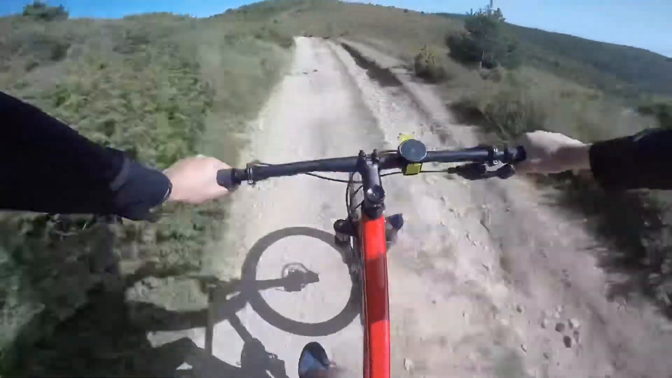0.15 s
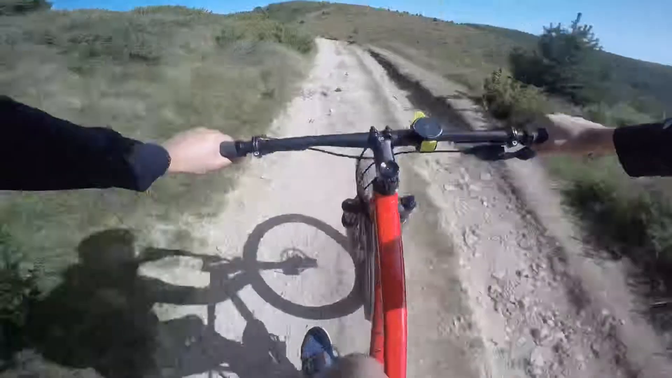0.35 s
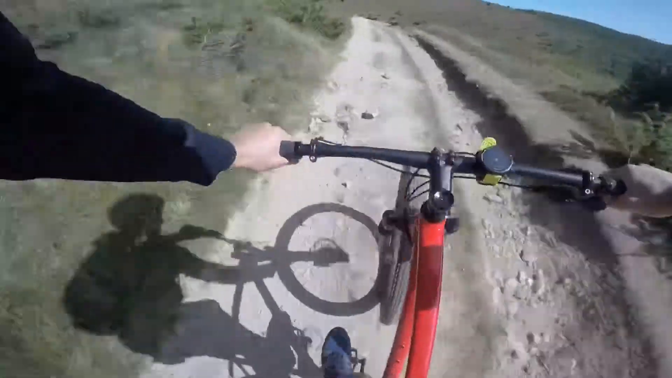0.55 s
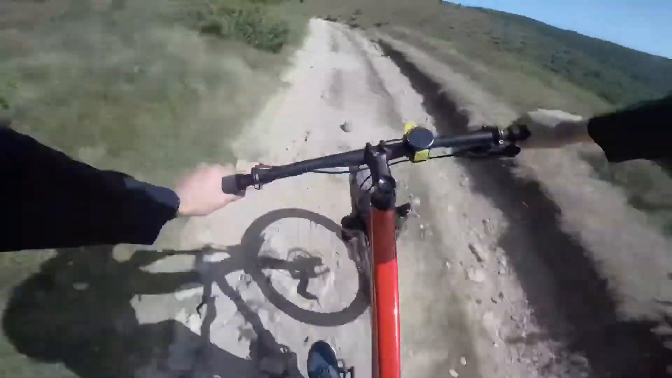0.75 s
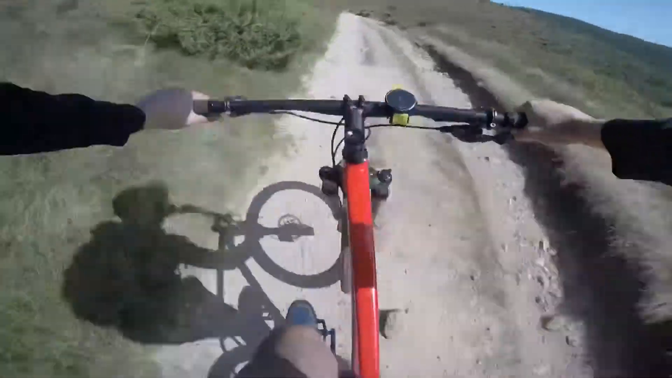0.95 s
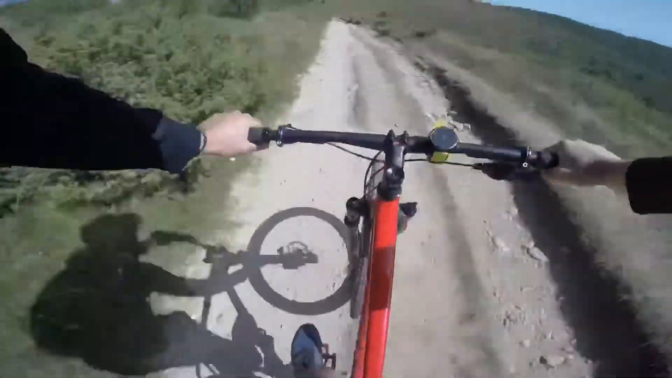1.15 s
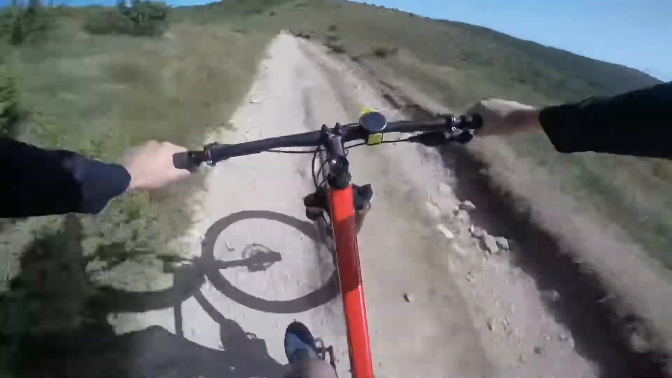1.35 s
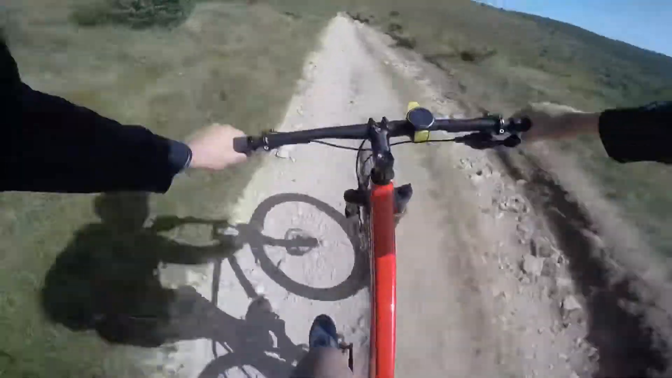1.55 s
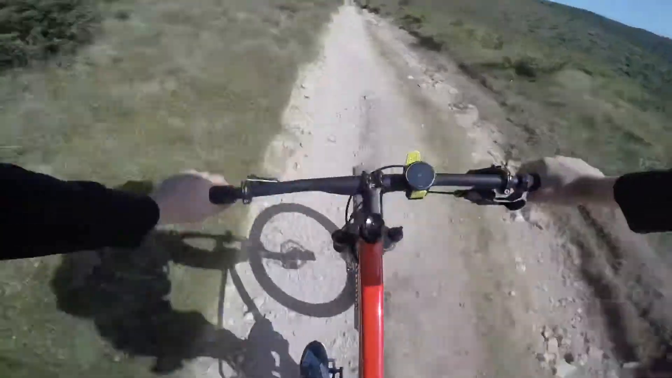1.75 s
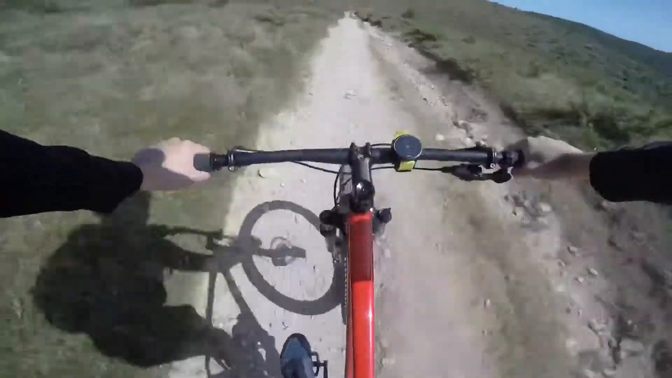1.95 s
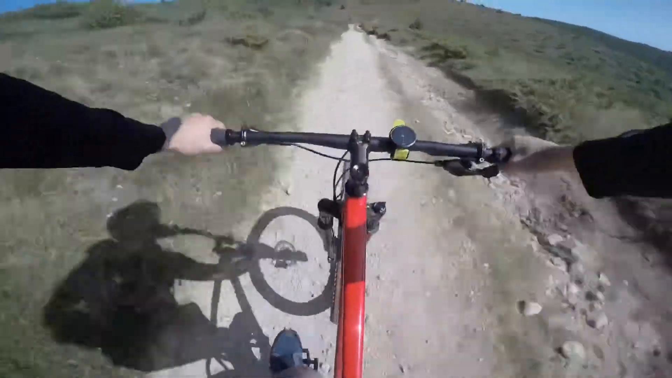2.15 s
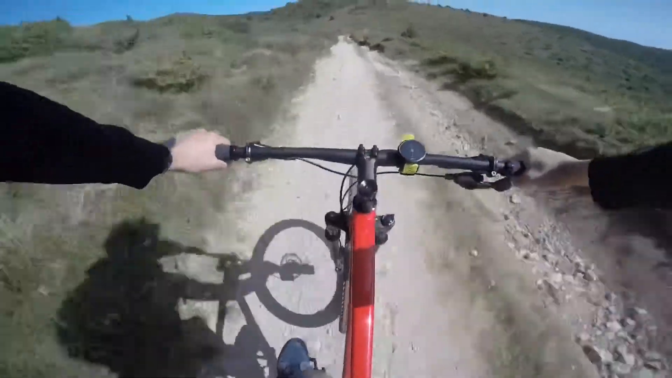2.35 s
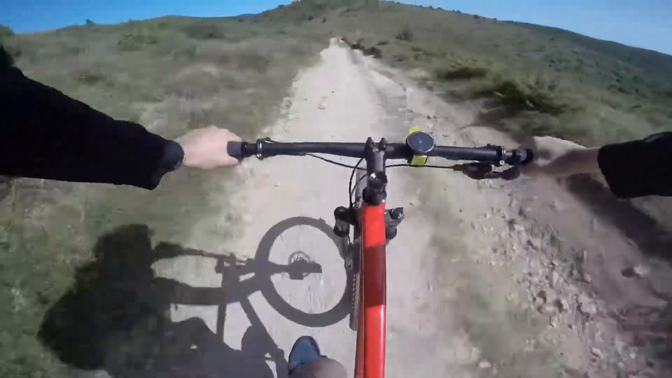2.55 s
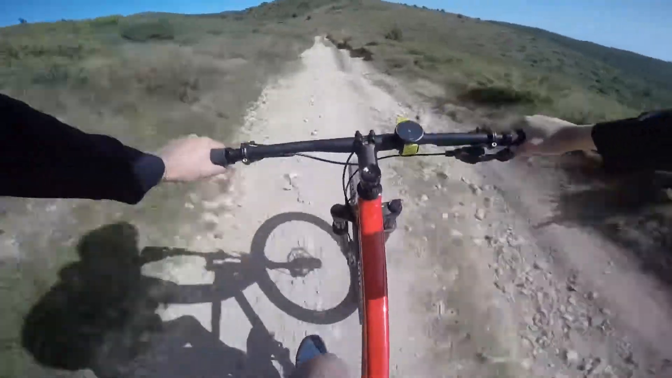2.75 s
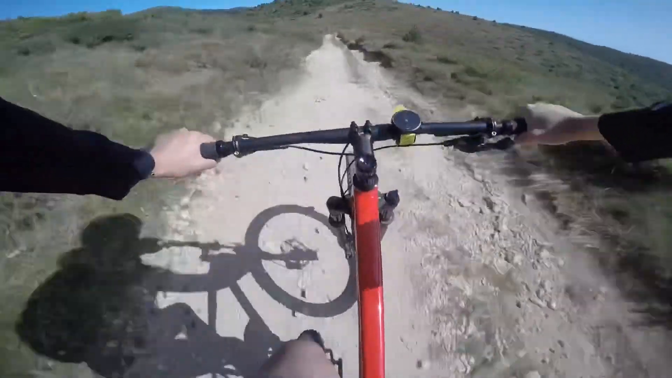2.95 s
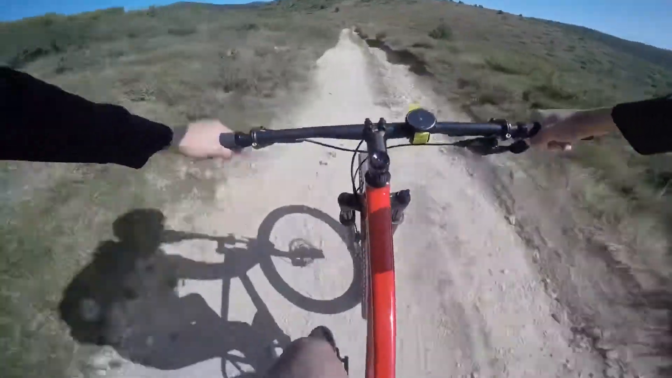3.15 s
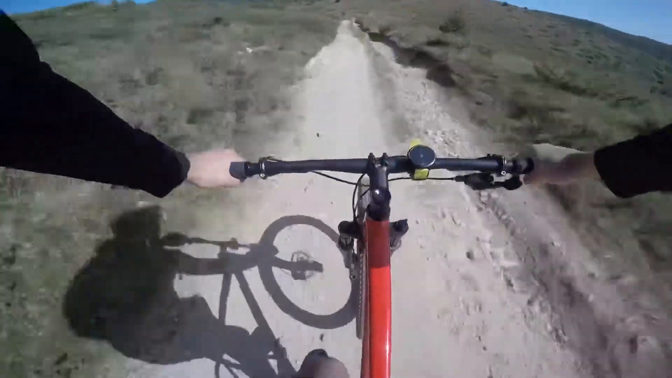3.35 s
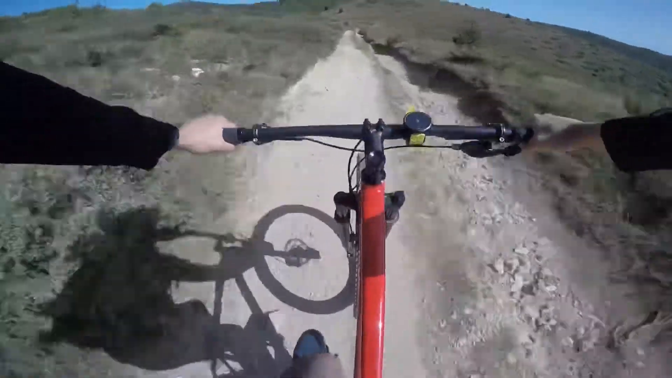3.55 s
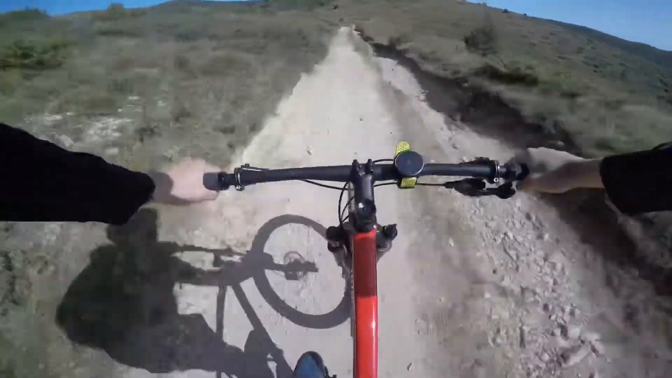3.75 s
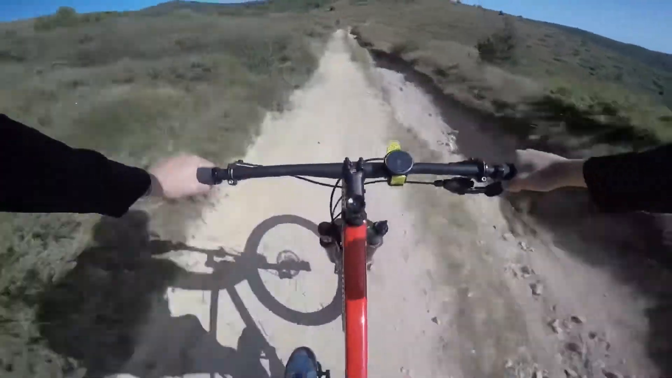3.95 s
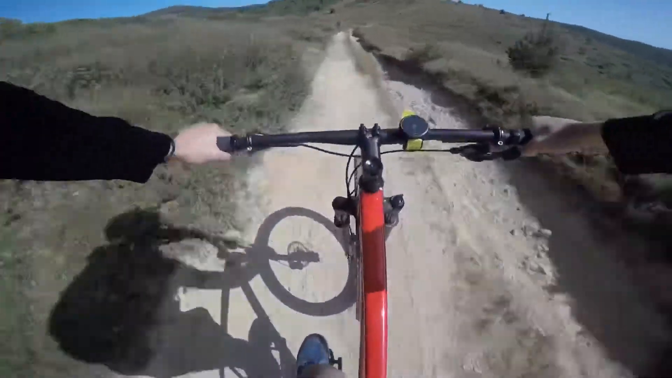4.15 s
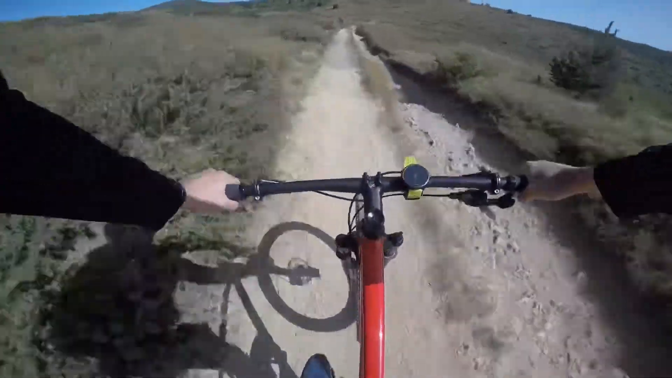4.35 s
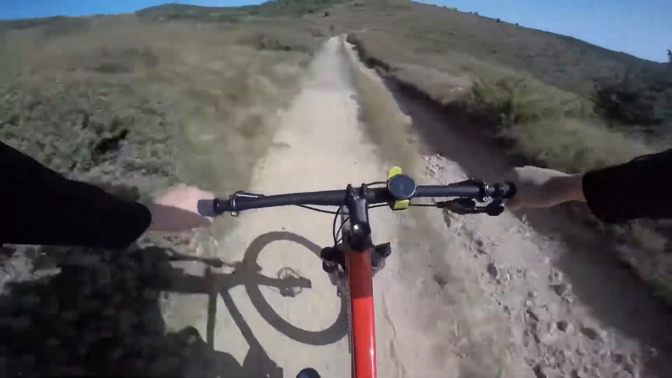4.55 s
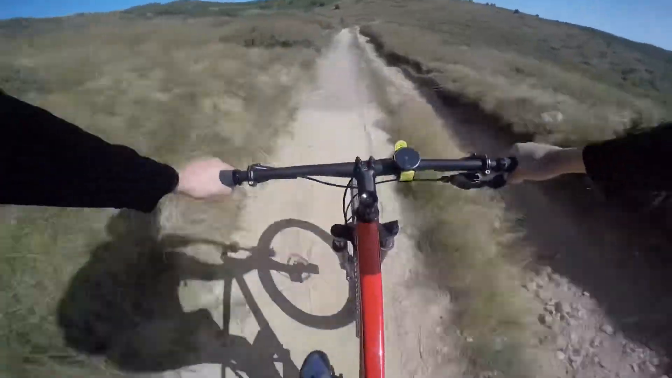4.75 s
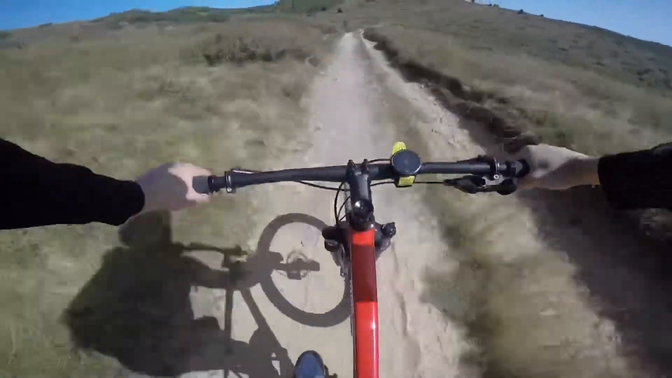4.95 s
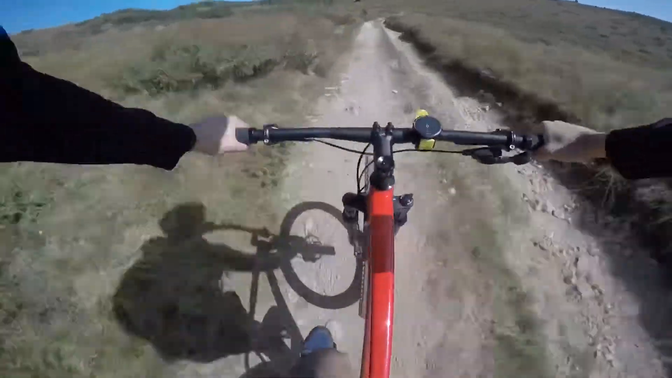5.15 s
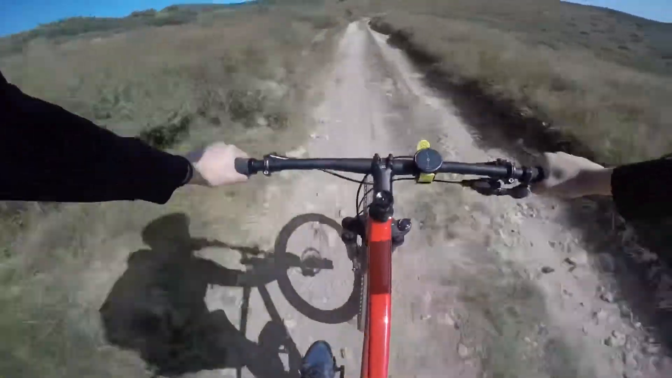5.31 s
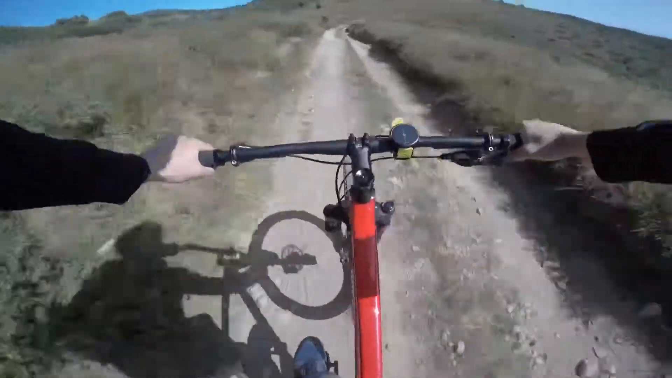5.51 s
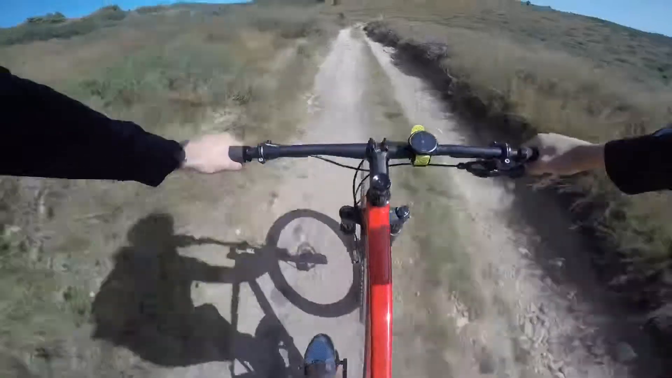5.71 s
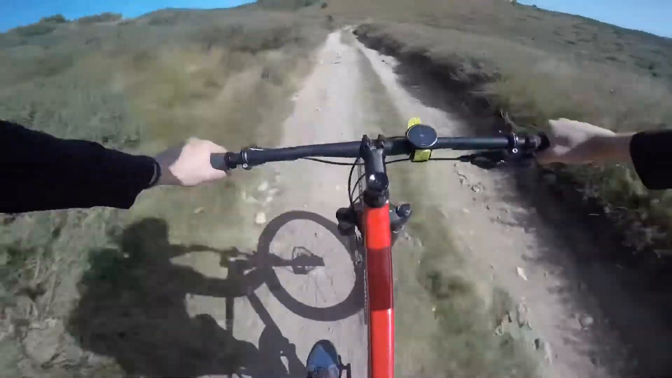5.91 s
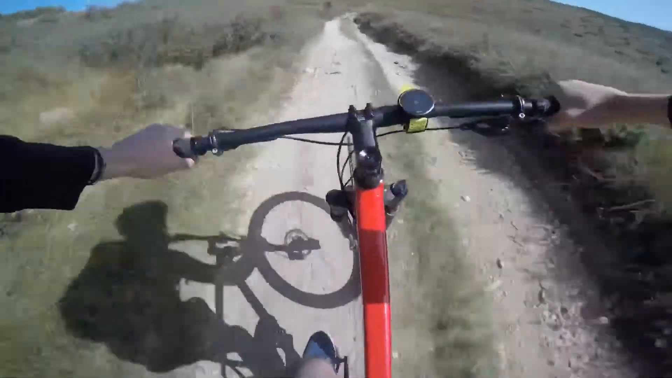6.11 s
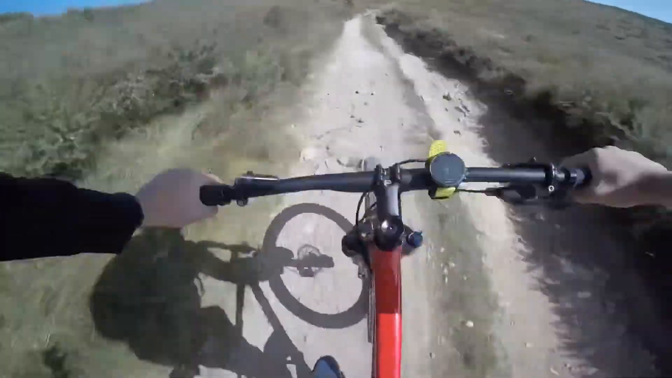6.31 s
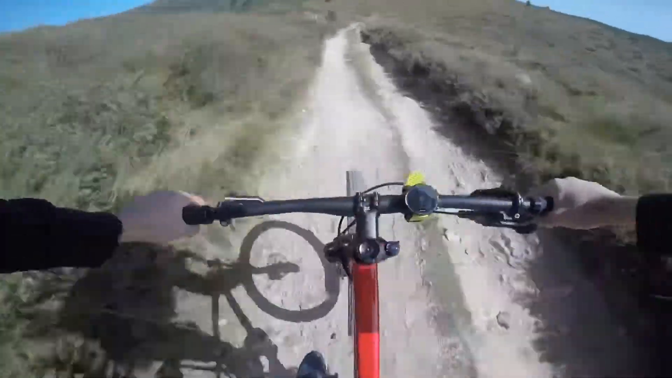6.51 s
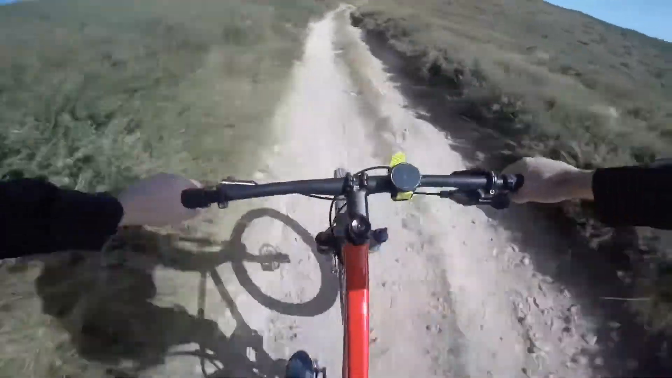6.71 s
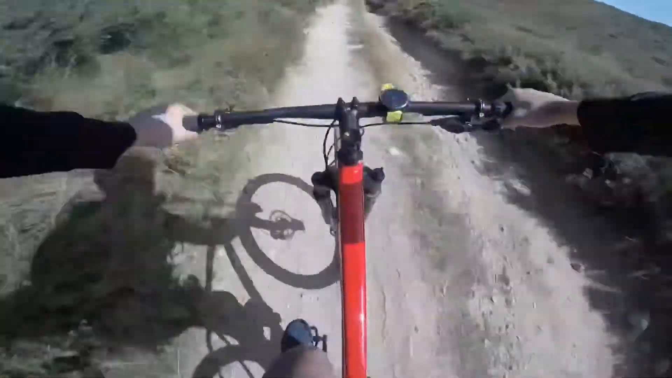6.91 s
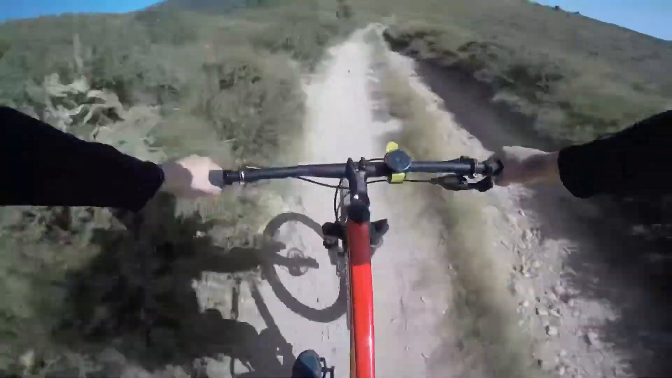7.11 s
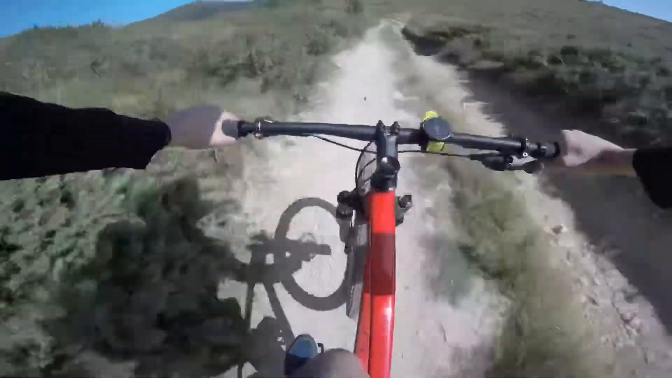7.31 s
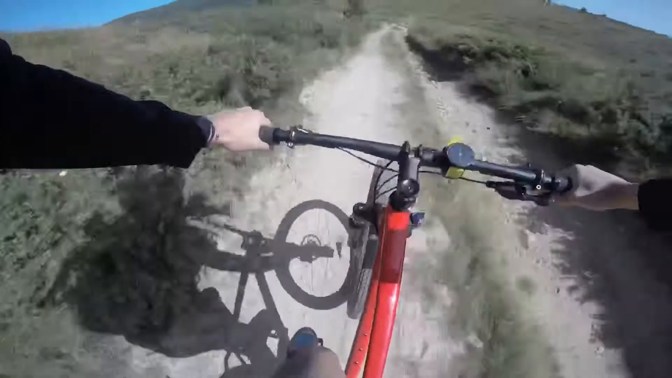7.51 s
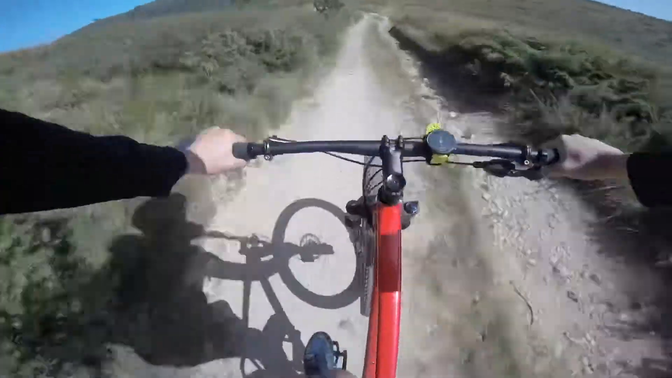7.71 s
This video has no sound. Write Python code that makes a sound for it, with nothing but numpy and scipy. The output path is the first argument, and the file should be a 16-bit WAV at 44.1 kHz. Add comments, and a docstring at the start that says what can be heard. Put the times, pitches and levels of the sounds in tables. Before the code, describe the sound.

Steady gritty crunching of bike tyres on a stony open track, close to a body-worn microphone. Hard early jolts bring a loud crack and brief metal ring, then scattered knocks, rattles and short gravel sprays. The middle runs a little smoother, before the crunch roughens and clacks bunch up in the last second or so. Soft ratchet buzzing, low wind buffeting, faint hiss and a thin high whine lie underneath.

```python
"""Gravel track, downhill: a mountain bike coasts, heard from a camera on the rider's chest.
Filtered random grains make the crunch and tyre rumble; decaying sines make thumps, jolts and a metal ping.
Filtered clicks and noise bursts make the clacks, rattles, flicks and stone sprays.
The freewheel buzzes softly as each click rings the hub's modes. Shaped noise makes wind and body shake,
above the camera's faint whine (sines) and hiss (noise)."""
import sys
import numpy as np
from scipy import signal
from scipy.fft import rfft, irfft, next_fast_len
from scipy.io import wavfile
from scipy.ndimage import uniform_filter1d, map_coordinates

SR = 44100
rng = np.random.default_rng(int(sys.argv[2]) if len(sys.argv) > 2 else 0)


def transcribe(signal):
    """Save signal, clipped to [-1, 1], as a 16-bit WAV file at the path in sys.argv[1]."""
    frames = np.atleast_2d(signal).T
    limited = np.clip(frames, -1, 1)
    pcm = np.round(limited * 32767).astype(np.int16)
    wavfile.write(sys.argv[1], SR, pcm)


N = 342657

# hollow knock, relative spectrum: f/Hz, level/dB
KNOCK_SPECTRUM = [(300, -30), (700, -16.5), (930, -4), (1150, 2.5), (1370, -7), (1650, -13), (2500, -24),
                  (6000, -63), (15000, -70)]
# sharp crack, relative spectrum: f/Hz, level/dB
CRACK_SPECTRUM = [(500, -19), (1100, -17.5), (1450, -2.5), (1850, -2.5), (2300, 3), (2750, -4),
                  (3200, -11.5), (5000, -19), (6300, -24.5), (8000, -36), (9000, -35), (15000, -67)]
BOUNCE_PER_S = 18  # random level knots per second as the wheels load and unload


def amp(db):
    """Decibels to gain."""
    return 10 ** (np.asarray(db) / 20)


def unit(x):
    """Scale to rms 1."""
    return x / np.sqrt(np.mean(x ** 2) + 1e-20)


def curves(rows):
    """One value per sample for each column after the time."""
    s, *cols = np.transpose(rows)
    return [np.interp(np.arange(N) / SR, s, c) for c in cols]


def wobble(rate):
    """A smooth random curve, rate knots a second."""
    return map_coordinates(rng.standard_normal(4096), [np.arange(N) * rate / SR + 2], mode="mirror")


def add(track, s, sound):
    """Mix a sound into a track at time s."""
    part = track[max(round(s * SR), 0):][:len(sound)]
    part += sound[:len(part)]


def sine(hz, t):
    """A sine of hz at the times t."""
    return np.sin(2 * np.pi * hz * t)


def filtered(x, response):
    """x times a complex response of frequency."""
    m = next_fast_len(N + SR // 2)
    return irfft(rfft(x, m) * response(np.fft.rfftfreq(m, 1 / SR)), m)[:N]


def coloured(x, spectrum, size=16384):
    """A minimum-phase filter through (Hz, dB) points, so that clicks keep their attack."""
    hz, db = np.transpose(spectrum)
    gain = amp(np.interp(np.log(np.fft.rfftfreq(size, 1 / SR) + 1), np.log(hz), db))
    cepstrum = irfft(np.log(gain))
    cepstrum[1:size // 2] *= 2  # fold to causal
    cepstrum[size // 2 + 1:] = 0
    return signal.fftconvolve(x, irfft(np.exp(rfft(cepstrum))))[:N]


def grains(rate, spread_db):
    """Contacts at random moments, rate a second, of random sign and exponentially spread dB size."""
    sizes = amp(spread_db * np.minimum(rng.standard_exponential(N), 4.5))
    return unit((rng.random(N) < rate / SR) * sizes * rng.choice([-1, 1], N))


def swells(rows):
    """A gain that swells and lets go once for each (middle s, length s, dB) row."""
    out = np.zeros(N)
    for s, length, db in rows:
        u = np.linspace(-2, 2, round(2 * length * SR))
        add(out, s - length, amp(db) * np.exp(-u ** 4))
    return out


def patchy(x, depth_db):
    """Each patch of ground favours its own stone sizes, so the colour keeps shifting."""
    z = signal.stft(x, nperseg=512)[2]
    field = uniform_filter1d(rng.standard_normal(z.shape), size=6, axis=0)
    field = uniform_filter1d(field, size=5, axis=1)
    return unit(signal.istft(z * amp(depth_db * unit(field)), nperseg=512)[1][:N])


def rolling_db(usual_db, grows):
    """Level of one rolling sound: grows dB per dB of coarseness; a hop takes the weight off the tyres."""
    # ground coarseness: t/s, crunch level/dB
    coarseness = [(0.0, -52.5), (0.43, -51.5), (0.67, -49.5), (0.78, -49), (1.88, -51.5), (2.55, -50.5),
                  (3.42, -49.5), (3.94, -52), (4.78, -51), (4.98, -46.5), (5.49, -48.5), (5.86, -50),
                  (6.21, -49.5), (6.43, -53.5), (6.66, -53.5), (6.9, -48.5), (7.36, -46.5), (7.77, -50)]
    # hops over a crest: middle t/s, length/s, drop of the crunch/dB
    hops = [(0.48, .09, 4.5), (2.586, 0.15, 5), (3.05, 0.17, 3.5), (4.106, 0.081, 2.5), (6.553, 0.13, 4)]
    usual_crunch_db = -50
    t = np.arange(N) / SR
    lift = sum(drop * np.exp(-(2 * (t - s) / length) ** 4) for s, length, drop in hops)
    return usual_db + grows * (curves(coarseness)[0] - lift - usual_crunch_db)


def electronics(hiss_db):
    """The camera's own thin whine and hiss: steady sines and shaped noise."""
    # whine: f/Hz, rms level/dB
    whine_lines = [(6293, -76), (6325, -77), (12618, -82)]
    # hiss, relative spectrum: f/Hz, level/dB
    hiss_spectrum = [(3000, 2.5), (6100, 1.5), (6300, 7), (6500, 3.5), (10800, -9.5), (11600, 1),
                     (12700, -2), (13400, -10), (15300, -10)]
    t = np.arange(N) / SR
    whine = sum(np.sqrt(2) * amp(db) * sine(hz, t) for hz, db in whine_lines)
    return whine + amp(hiss_db) * unit(coloured(rng.standard_normal(N), hiss_spectrum))


def wind(steadiness, level_db, flutter_db, surge_db):
    """Slow eddies and the rider's shaking push on the microphone."""
    # airstream: t/s, relative buffeting level/dB
    airstream = [(0.0, -36.5), (0.97, -26.5), (1.15, -32.5), (1.65, -29.5), (2.23, -38), (2.66, -38.5),
                 (2.95, -33), (3.3, -38), (3.55, -35), (4.15, -45.5), (4.39, -44), (4.65, -35), (4.82, -33),
                 (5.41, -33.5), (5.8, -37), (6.12, -31.5), (6.38, -27.5), (6.66, -33), (7.0, -31),
                 (7.77, -37.5)]
    # surges of shake and buffeting: middle t/s, length/s, relative level/dB
    surges = [(.44, 0.045, -15.5), (.6, 0.08, -18.5), (.89, 0.079, -16.5), (1.42, 0.17, -25.5),
              (2.44, 0.062, -22.5), (3.0, 0.15, -27), (5.92, 0.085, -18.5), (6.29, 0.05, -13.5),
              (6.375, 0.072, -14), (6.82, 0.1, -21), (7.17, 0.27, -29), (7.35, 0.097, -25.5),
              (7.73, 0.072, -21.5)]
    # airstream, relative spectrum: f/Hz, level/dB
    stream_spectrum = [(8, -9), (18, 3), (27, -0.5), (40, -11.5), (60, -17), (100, -30), (300, -78.5),
                       (900, -110)]
    # slow heave of a surge, relative spectrum: f/Hz, level/dB
    heave_spectrum = [(8, -17), (18, -1.5), (27, 2.5), (40, -13.5), (60, -39.5), (100, -40), (300, -87),
                      (900, -115)]

    def eddies(spectrum):
        """Low noise with its own level swings evened out."""
        noise = unit(coloured(rng.standard_normal(N), spectrum))
        swell = np.sqrt(np.abs(uniform_filter1d(noise ** 2, SR // 12)) + 1e-3)
        return unit(noise / swell ** steadiness)

    stream = amp(curves(airstream)[0] + level_db + flutter_db * wobble(5.4))
    return stream * eddies(stream_spectrum) + amp(surge_db) * swells(surges) * eddies(heave_spectrum)


def freewheel(level_db, size_db, scatter_s, waver_db, drift_db):
    """Pawls drop over the ratchet's teeth; each click rings the hub, whose modes come and go."""
    # ratchet speed: t/s, rate/clicks per s
    click_rate = [(0, 85), (.6, 103), (1.45, 69), (2.0, 78), (2.6, 77), (3.2, 81), (3.8, 91), (4.3, 91),
                  (4.7, 100), (5.5, 84), (6.1, 91), (6.6, 84), (7.0, 100), (7.77, 90)]
    # hub modes: f/Hz, relative level/dB, t60/s
    hub_modes = [(3450, 4.5, 0.025), (4880, 1, 0.012), (6960, -3.5, 0.017), (7860, -3, 0.028),
                 (9700, -4.5, .014), (11600, -6, 0.0057), (12600, -5.5, 0.0087)]
    teeth = np.cumsum(curves(click_rate)[0]) / SR
    times = np.flatnonzero(np.diff(np.floor(teeth))) / SR
    t = np.arange(SR // 25) / SR
    rings = np.array([amp(db - 60 * t / t60) * sine(hz, t) for hz, db, t60 in hub_modes])
    chance = rng.standard_normal((1024, len(hub_modes) + 1))
    drifts = unit(uniform_filter1d(rng.standard_normal((1024, len(hub_modes))), size=7, axis=0))
    out = np.zeros(N)
    for s, (late, *sizes), drift in zip(times, chance, drifts):
        mode_gains = amp(size_db * np.array(sizes) + drift_db * drift)
        add(out, s + scatter_s * late, mode_gains @ rings)
    return amp(level_db + waver_db * wobble(4.6)) * unit(out)


def tyres(level_db, spread_db, bounce_db):
    """Knobs and small stones drum on the air-filled tyres: random grains through a low spectrum."""
    # track bumpiness: t/s, relative rumble level/dB
    bumpiness = [(0.0, -47.5), (1.36, -43.5), (2.6, -49), (3.48, -45), (4.02, -47.5), (4.7, -46),
                 (5.02, -41.5), (6.34, -43), (6.6, -48), (6.95, -40), (7.12, -45), (7.77, -40.5)]
    # tyre drumming, relative spectrum: f/Hz, level/dB
    tyre_spectrum = [(35, -15), (65, 1.5), (90, 2), (125, -1), (165, -6), (220, -13), (340, -15),
                     (480, -23), (900, -22.5), (3000, -121)]
    level = curves(bumpiness)[0] + level_db + bounce_db * wobble(BOUNCE_PER_S)
    return amp(level) * unit(coloured(grains(900, spread_db), tyre_spectrum))


def thumps(level_db, t60, thud_t60):
    """A larger stone makes the tyre boom for a moment, with a short dull thud of higher partials."""
    # tyre on a large stone: t/s, relative boom level/dB, relative thud level/dB
    stone_hits = [(0.254, -34, -47), (0.369, -36, -37), (.634, -38, -37.5), (.699, -25.5, -41),
                  (1.239, -21, -33.5), (1.574, -28.5, -42), (2.114, -32, -37), (2.441, -51, -35),
                  (2.713, -41, -53), (2.838, -41, -40), (3.121, -36, -39), (3.543, -29, -48),
                  (5.171, -27.5, -43), (5.507, -27.5, -43), (6.097, -29, -43), (6.181, -27, -34),
                  (6.683, -47, -42), (6.797, -29.5, -49), (7.301, -32.5, -32.5), (7.39, -19, -40),
                  (7.566, -28, -45)]
    mean_boom_hz = 148.2
    t = np.arange(SR // 5) / SR
    onset = 1 - np.exp(-t / 0.001)
    out = np.zeros(N)
    for s, db, thud_db in stone_hits:
        hz = mean_boom_hz * rng.normal(1, 0.094)
        boom = amp(db - 60 * t / t60) * sine(hz, t)
        partials = sum(sine(hz * k * rng.normal(1, 0.032), t) / k for k in (1.6, 2.3, 3.7))
        thud = amp(thud_db - 60 * t / thud_t60) * partials
        add(out, s, amp(level_db) * (boom + 2 * thud) * onset)
    return out


def jolts(level_db, t60, rise_s):
    """The wheels drop into a hole: a decaying low sine of tyres and frame, its start cushioned by the fork."""
    # jolts: t/s, relative level/dB, f/Hz
    holes = [(.252, -24, 78), (.42, -16, 51), (0.565, -14.5, 48), (0.855, -16, 46), (1.358, -13.5, 50),
             (2.446, -25, 99), (2.71, -25.5, 102), (3.836, -27.5, 108), (4.136, -23, 55), (5.895, -20, 36),
             (6.26, -16.5, 99), (6.272, -15, 38), (7.399, -14.5, 64), (7.716, -18, 80)]
    t = np.arange(SR // 5) / SR
    cushion = 1 - np.exp(-np.square(t / rise_s))
    out = np.zeros(N)
    for s, db, hz in holes:
        add(out, s, amp(db + level_db - 60 * t / t60) * cushion * sine(hz, t))
    return out


def rattles(per_s, spread_db, knock_db, crack_db, grows):
    """Loose parts tick lightly at random, louder on coarse ground."""
    ticks = grains(per_s, spread_db)
    knock = unit(coloured(ticks, KNOCK_SPECTRUM))
    crack = unit(coloured(ticks * amp(3.8 * wobble(40)), CRACK_SPECTRUM))
    return amp(rolling_db(knock_db, grows)) * knock + amp(rolling_db(crack_db, grows)) * crack


def pings(crack_db):
    """A flung stone cracks against metal, bounces, and rings its modes."""
    # stone on metal: t/s, level/dB
    strikes = [(0.7251, -38.5), (0.7285, -35)]
    # metal modes: f/Hz, relative level/dB, t60/s
    metal_modes = [(2700, -5, .012), (3467, 3.5, 0.04), (4420, 3, 0.012), (4920, -1.5, 0.011),
                   (6400, -7, 0.01), (7330, -9, .018), (7600, -13, .02)]
    t = np.arange(SR // 8) / SR
    out = np.zeros(N)
    for s, level in strikes:
        ring = sum(amp(db + rng.normal(0, 1.3) - 60 * t / t60) * sine(hz, t) for hz, db, t60 in metal_modes)
        crack = amp(crack_db - 60 * t / 0.011) * rng.standard_normal(len(t))
        add(out, s, amp(level) * (ring + crack))
    return out


def flicks(level_db, t60):
    """Grit flicks the frame, too light to knock: a short bright tick of decaying noise."""
    # grit on the frame: t/s, relative level/dB
    grit_hits = [(0.86, -34.5), (1.7495, -46), (1.809, -45), (1.959, -47), (3.441, -39), (5.3498, -41),
                 (5.804, -40), (6.800, -41), (6.8284, -37), (6.8575, -36)]
    # tick, relative spectrum: f/Hz, level/dB
    tick_spectrum = [(800, -35), (2500, -18), (4400, 7), (6000, -8), (7800, 2), (8800, -12), (11800, -10.5),
                     (15000, -28)]
    t = np.arange(SR // 30) / SR
    out = np.zeros(N)
    for s, db in grit_hits:
        tick = coloured(amp(-60 * t / t60) * rng.standard_normal(len(t)), tick_spectrum, size=1024)
        add(out, s, amp(db + level_db) * tick / np.linalg.norm(tick))
    return out


def clacks(clunk_db, knock_db, crack_db, chatter_db, chatter_t60, scrape_s):
    """Stones and loose parts scrape in, clunk, knock and crack (crack pitch per hit), then chatter briefly."""
    # clacks: t/s, relative clunk, knock and crack levels/dB, crack pitch f/Hz
    hits = [(0.067, -53, -41, -42, 2570.0), (0.098, -44, -45, -40, 2510.0), (0.170, -52, -39, -34.5, 2250),
            (0.2534, -32, -41, -54, 2060.0), (0.3295, -58.0, -39.5, -39, 2350.0),
            (0.338, -54, -35, -38, 2200), (0.462, -57, -42, -42, 2050.0), (0.491, -58, -58.5, -36, 2290.0),
            (0.7478, -33, -18, -22, 2230), (0.821, -31, -46, -48, 2270), (1.0413, -39, -51, -46, 2610.0),
            (1.333, -50, -38, -29, 2200), (1.428, -56, -29, -27.5, 1950), (1.588, -52, -43, -32, 2300),
            (1.679, -60.0, -44, -37, 2320.0), (1.749, -49, -44, -29.5, 2620.0),
            (1.786, -59.0, -40, -32, 1950), (1.882, -52, -44, -30, 2320), (1.967, -52, -37, -39, 2350),
            (2.08, -32, -42, -54, 2000), (2.105, -50, -42, -53, 2000), (2.13, -35, -40, -52, 2000),
            (2.310, -52, -40, -45, 2210), (2.568, -34, -50, -56, 2210), (2.4317, -55, -35, -37, 2400),
            (2.4432, -34, -31, -32, 1990), (2.8376, -31.5, -40, -41, 2270),
            (2.966, -35.5, -39, -40, 2490.0), (3.082, -55, -60, -42, 2750),
            (3.119, -43, -37.5, -53, 2120.0), (3.1889, -35, -36, -31.5, 2290),
            (3.245, -37, -34, -38, 1700.0), (3.331, -52, -35, -35.5, 2410),
            (3.4385, -36, -29.5, -27.5, 2450), (3.5466, -28, -35, -43, 2430), (3.559, -55, -50, -40, 2420),
            (3.5744, -50, -37, -33.5, 1940.0), (3.8912, -41, -33, -25, 2400),
            (4.067, -57, -54, -40, 1810.0), (4.3689, -40, -47, -33.5, 2200.0), (4.696, -50, -38, -40, 2580),
            (4.8043, -33, -48, -37, 2400), (4.907, -50, -27.5, -30.5, 2540),
            (5.367, -59.0, -38, -35.5, 1870.0), (5.872, -31, -33, -35, 2240.0),
            (5.9846, -39, -40, -39, 2190.0), (6.0587, -46.0, -48, -47, 2180.0),
            (6.345, -50, -52, -41, 2300), (6.361, -30, -49, -46, 2210), (6.548, -39, -52, -58, 2190),
            (6.6854, -38, -35, -39, 2700.0), (6.7777, -54, -42, -32.5, 2520.0),
            (6.8268, -51, -33, -29, 2170.0), (6.8646, -32, -23, -21.5, 2000),
            (6.884, -35, -34, -26.5, 1920.0), (6.9716, -50, -33, -32.5, 2080),
            (6.9931, -53, -29, -25, 2030.0), (7.3042, -40, -28, -30.5, 2330.0),
            (7.3972, -35, -29, -29, 2240.0), (7.4071, -47.5, -22, -16.5, 2060),
            (7.4211, -30, -28, -25, 2300), (7.4475, -52.0, -25.5, -24, 2230), (7.563, -50, -45, -33, 2310),
            (7.574, -48, -38.5, -35.5, 2200)]
    # low clunk, relative spectrum: f/Hz, level/dB
    clunk_spectrum = [(120, -21.5), (250, -4.5), (350, 3), (450, -8.5), (620, -18), (900, -38), (3000, -57),
                      (15000, -80)]
    usual_crack_hz = 2310  # pitch of the unshifted crack spectrum
    lead = SR // 100
    t = np.arange(-lead, SR // 20) / SR
    contact = amp(chatter_db - 60 * np.maximum(t / chatter_t60, -t / scrape_s))
    out = np.zeros(N)
    for s, clunk, knock, crack, hz in hits:
        voices = [(clunk_spectrum, clunk + clunk_db, 1),
                  (KNOCK_SPECTRUM, knock + knock_db, 1),
                  (CRACK_SPECTRUM, crack + crack_db, hz / usual_crack_hz)]
        for spectrum, db, pitch in voices:
            blow = (t == 0) + contact * rng.standard_normal(len(t))
            sound = coloured(blow, np.multiply(spectrum, [pitch, 1]), size=1024)
            add(out, s + t[0], amp(db) * sound / np.linalg.norm(sound))
    return out


def scuffs(level_db, per_s, spread_db):
    """A tyre biting into loose gravel throws a short spray of small stones: gated random grains."""
    # bites: middle t/s, length/s, relative level/dB
    bites = [(.7, 0.045, -47), (.84, 0.032, -40.5), (.899, 0.089, -45.5), (.998, 0.026, -44),
             (1.279, 0.025, -41), (1.337, 0.031, -43.5), (1.391, 0.047, -38), (1.481, 0.037, -43),
             (1.69, 0.023, -44), (1.763, 0.042, -46.5), (1.838, 0.055, -44), (1.89, 0.049, -47),
             (1.958, 0.056, -45.5), (3.44, 0.085, -46), (4.556, 0.057, -46.5), (4.818, 0.041, -41),
             (4.86, 0.032, -47), (4.93, .025, -46.5), (4.99, 0.037, -49), (5.93, 0.038, -42),
             (5.986, 0.02, -46.5), (6.16, 0.099, -42), (6.245, 0.042, -42.5), (6.305, 0.049, -45),
             (6.365, 0.048, -49.5), (6.77, 0.089, -49), (6.865, 0.12, -43), (7.34, 0.049, -39.5),
             (7.42, 0.045, -38)]
    # spray, relative spectrum: f/Hz, level/dB
    spray_spectrum = [(300, -12), (600, -8), (1100, 5), (1500, -2), (2000, 3.5), (2700, 1.5), (3300, -7.5),
                      (4200, -6), (5100, -11), (6300, -21), (8000, -22), (9000, -27), (15000, -36)]
    return amp(level_db) * swells(bites) * unit(coloured(grains(per_s, spread_db), spray_spectrum))


def body(f):
    """Response of the bike's and the camera housing's resonances, as summed band-passes."""
    # resonances: f/Hz, width/Hz, level/dB
    resonances = [(1087, 170, 0.5), (2620, 260, 1.5), (4170, 67, -37), (4570, 47, -30), (7900, 29, -27),
                  (9500, 220, -34)]
    return sum(amp(db) * 1j * f * w / (c * c - f * f + 1j * f * w) for c, w, db in resonances)


def gravel(clump_db, stones_db, stones_per_s, crunch_per_s):
    """Stones grind under the tread in clumps and set the bike droning; the larger ones tick singly."""
    # coarse crunch, relative spectrum: f/Hz, level/dB
    crunch_spectrum = [(300, -3.5), (580, -7), (780, -3.5), (1200, 3), (1450, 0.5), (2100, 0), (2750, -2),
                       (3200, -0.5), (3450, -4), (3750, -10), (4150, -5), (4600, -17), (5000, -8),
                       (6000, -50), (9000, -51)]
    # fine grit, relative spectrum: f/Hz, level/dB
    grit_spectrum = [(3000, -31.5), (4400, 5), (5000, 6.5), (5600, 2), (7200, 0.5), (7800, 0), (8700, -22),
                     (9700, -16), (10700, -23), (12500, -7), (13400, -19), (15300, -39)]
    bounce_db = 0.53 * wobble(BOUNCE_PER_S)
    drone_level_db = rolling_db(-55, grows=0.55) + bounce_db
    crunch_level_db = rolling_db(-52.5, grows=1) + bounce_db
    grit_level_db = rolling_db(-65.5, grows=0.52)
    load = wobble(70)

    def clumps():
        """Clumping gain, partly shared by all sizes of stone."""
        return amp(clump_db * unit(load + wobble(130)))

    drone = unit(filtered(grains(5000, spread_db=0.0), body))
    coarse = patchy(coloured(grains(crunch_per_s, spread_db=-1.0), crunch_spectrum), depth_db=2.0)
    cracks = unit(coloured(grains(stones_per_s, spread_db=-0.5), CRACK_SPECTRUM))
    knocks = unit(coloured(grains(83, spread_db=4.5), KNOCK_SPECTRUM))
    fine = patchy(coloured(grains(7000, spread_db=2.5), grit_spectrum), depth_db=3.5)

    grinding = clumps() * (drone * amp(drone_level_db) + coarse * amp(crunch_level_db))
    stones = (cracks + 0.87 * knocks) * amp(crunch_level_db + stones_db)
    return grinding + stones + clumps() * fine * amp(grit_level_db)


def scene():
    """Everything meets at one microphone; the camera housing colours the sprays, clacks and rattles."""
    # housing colour: f/Hz, gain/dB
    housing = [(900, 0.5), (1080, 0.5), (1350, 0.5), (2000, -1), (3000, 2), (3500, -2.5), (4100, 0),
               (4500, -3), (5000, 2), (5800, -0.5), (6300, 2.5), (7300, -1.5), (8000, 3), (8800, -1.5),
               (15000, 2)]
    air = wind(steadiness=0.95, level_db=6.5, flutter_db=0.5, surge_db=-0.5)
    hub = freewheel(level_db=-67.0, size_db=3.5, scatter_s=0.00017, waver_db=2.0, drift_db=3.0)
    rumble = tyres(level_db=1.86, spread_db=2.5, bounce_db=1.0)
    rumble += thumps(level_db=-2.0, t60=0.077, thud_t60=0.04)
    rumble += jolts(level_db=-1.5, t60=0.1, rise_s=0.0041)
    loose = rattles(per_s=26, spread_db=2.5, knock_db=-63.0, crack_db=-65.0, grows=2.3)
    bright = pings(crack_db=-23) + flicks(level_db=10.5, t60=0.0088)
    bike = clacks(clunk_db=12, knock_db=14.5, crack_db=15.0,
                  chatter_db=-26, chatter_t60=0.039, scrape_s=0.0055)
    spray = scuffs(level_db=0.37, per_s=2200, spread_db=2.0)
    ground = gravel(clump_db=1.3, stones_db=-6.5, stones_per_s=100, crunch_per_s=1200)
    contacts = coloured(spray + bike + loose, housing)
    return (electronics(hiss_db=-68.5) + air + hub + rumble + bright + contacts + ground)[None]


def record(dry):
    """The camera keeps nothing above its band limit."""
    top_hz = 15300
    return filtered(dry[0], lambda hz: hz < top_hz)[None]


dry = scene()
out = record(dry)
transcribe(out)
```